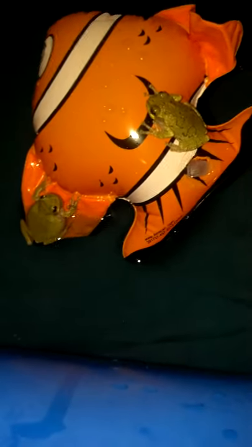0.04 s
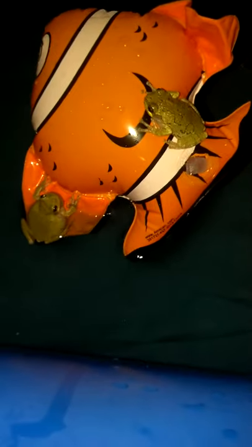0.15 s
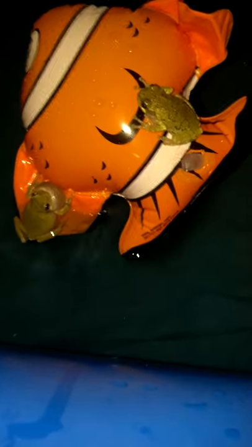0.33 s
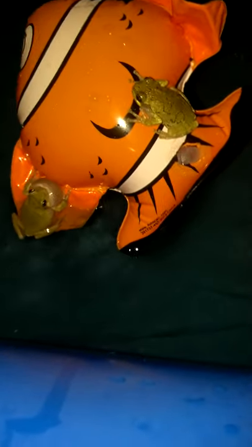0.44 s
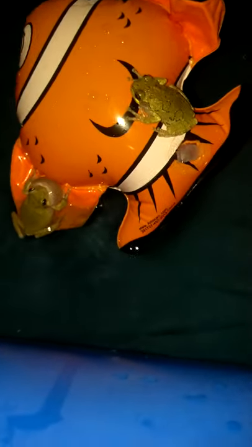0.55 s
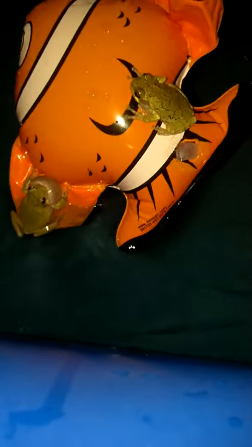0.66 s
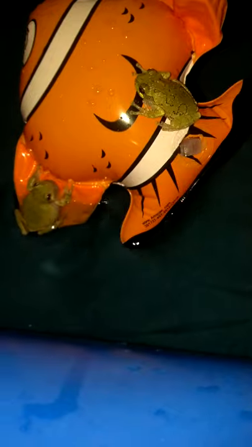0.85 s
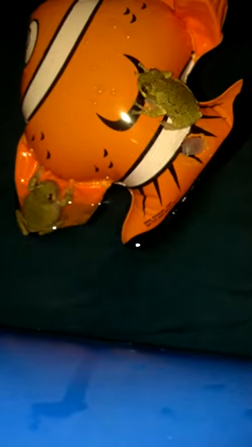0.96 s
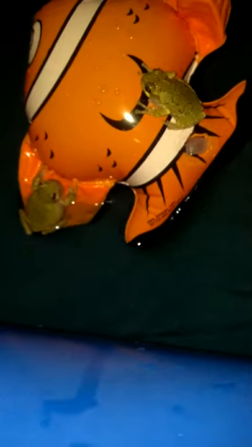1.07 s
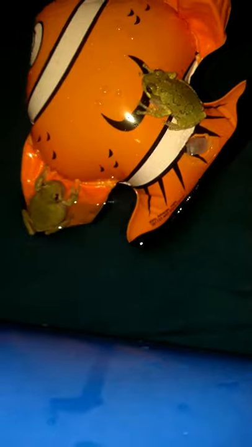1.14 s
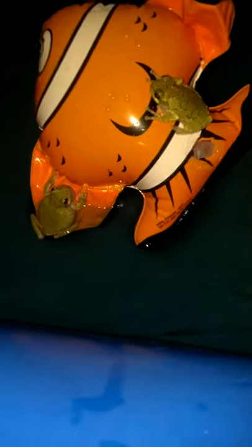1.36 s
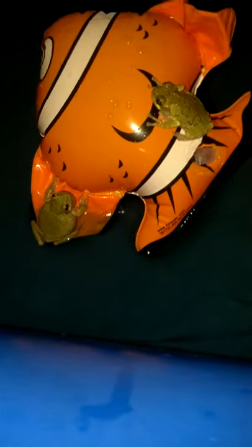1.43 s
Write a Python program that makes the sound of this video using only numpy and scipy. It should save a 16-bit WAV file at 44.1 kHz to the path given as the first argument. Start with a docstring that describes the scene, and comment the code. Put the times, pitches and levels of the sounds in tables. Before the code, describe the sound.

A tree frog's loud, harsh croak dominates, from about 0.21 to 0.74 seconds: rapid rising chirps, roughly 54 per second, fused into a buzzing rattle, its onset crackling with overload. Before it, a distant call's tail fades, then a soft bump at 0.15 and tiny throat clicks near 0.2. Slight poolside reflections follow; ducked faint night noise creeps back, and a far frog throbs faintly from 1.1.

```python
"""Night at a pool: faint steady outdoor noise throughout, with the tail of a distant frog call at the start.
A soft falling bump on the camera and three tiny throat clicks lead up to the main call.
A tree frog on a pool float then calls harshly for half a second, close by: a train of short rising chirps,
about 54 a second, of gliding sine partials and shaped noise, the first with overload crackle, with reflections.
The call makes the gain control duck the background, which creeps back; the far frog, throbbing noise, answers."""
import sys
import numpy as np
from scipy import signal
from scipy.fft import rfft, irfft
from scipy.io import wavfile
from scipy.ndimage import uniform_filter1d, minimum_filter1d

SR = 44100
rng = np.random.default_rng(int(sys.argv[2]) if len(sys.argv) > 2 else 0)


def output_pcm(signal):
    """Save a mono or channel-first signal as 16-bit PCM at the path in sys.argv[1].

    Samples are clipped to [-1, 1] before scaling.
    """
    pcm = np.clip(np.atleast_2d(signal).T, -1, 1) * 32767
    wavfile.write(sys.argv[1], SR, np.round(pcm).astype(np.int16))


N = 66150  # 1.5 s


def amp(db):
    """Decibels to gain."""
    return 10 ** (np.asarray(db) / 20)


def unit(x):
    """Scales to rms 1."""
    return x / np.sqrt(np.mean(x ** 2) + 1e-20)


def read(points, hz):
    """Reads a table of (f/Hz, value) on a log-frequency axis."""
    f, value = np.transpose(points)
    return np.interp(np.log(hz + 1), np.log(f + 1), value)


def noise(points):
    """Noise of rms 1, its spectrum shaped by (f/Hz, level/dB)."""
    shape = amp(read(points, np.fft.rfftfreq(N, 1 / SR)))
    return unit(irfft(rfft(rng.standard_normal(N)) * shape, N))


def ramp(u):
    """Smooth step from 0 to 1."""
    return np.sin(np.pi / 2 * np.clip(u, 0, 1)) ** 2


# outdoor noise colour shared by both microphone ports: [f/Hz, relative level/dB]
AIR_SHARED = [(18, -87.5), (30, -57.5), (118, -6.5), (261, -7), (291, -8), (480, -2.5), (881, -14),
              (1180, -7), (2340, -22), (2740, -44), (3130, -25), (4650, -22.5), (8310, -37), (14800, -36),
              (16500, -49.5)]
# outdoor noise colour in opposite phase at the ports: [f/Hz, relative level/dB]
AIR_OPPOSED = [(18, -41), (30, -9.5), (359, -3.5), (467, -8.5), (1180, -24), (1420, -28), (2340, -19.5),
               (8530, -35), (9730, -40.5), (14100, -28.5), (16500, -57)]
AIR_SHARED_DB, AIR_OPPOSED_DB = -54, -54.5  # rms


def night_air():
    """Faint steady outdoor noise: a shared part, plus a part opposed between ports that widens the bass."""
    mid = amp(AIR_SHARED_DB) * noise(AIR_SHARED)
    side = amp(AIR_OPPOSED_DB) * noise(AIR_OPPOSED)
    return np.array([mid + side, mid - side])


# calls of the distant frog: [t/s at full level, length/s, level/dB before the throb]
FAR_CALLS = [(0, 0.068, -56.5), (1.111, .36, -63.5)]
FAR_HZ, FAR_WIDTH_HZ, FAR_UPPER_DB = 1250, 110, -27  # main band, half-width, level of the upper band
FAR_THROB_HZ, FAR_THROB_DEPTH, FAR_FADE_S = 54, 1, .03


def far_frog():
    """A far call, blurred by the way into a throbbing noise band and a weak one almost an octave up."""
    t, hz = np.arange(N) / SR, np.fft.rfftfreq(N, 1 / SR)
    band = np.zeros(len(hz))
    for ratio, db in ((1, 0), (1.85, FAR_UPPER_DB)):
        band += amp(db) / (1 + ((hz - ratio * FAR_HZ) / FAR_WIDTH_HZ) ** 2)
    level = np.zeros(N)
    for start, length, db in FAR_CALLS:
        fade_in = ramp((t - start) / FAR_FADE_S + 1)
        fade_out = np.exp(-np.maximum(t - start - length, 0) / FAR_FADE_S)
        level += amp(db) * fade_in * fade_out
    throb = 1 + FAR_THROB_DEPTH * np.sin(2 * np.pi * FAR_THROB_HZ * t)
    blur = irfft(rfft(rng.standard_normal((2, N))) * band, N)
    return level * throb * unit(blur + .4 * blur[::-1])  # ports partly alike


# a soft bump on the camera, one row: [t/s, level/dB, start f/Hz, end f/Hz, length/s]
BUMP = (.1455, -33, 420, 90, .016)


def bump():
    """A short thud falling in pitch, pushing the two ports opposite ways, the right a little later."""
    start, db, from_hz, to_hz, length = BUMP
    u = np.clip((np.arange(N) / SR - start) / length, 0, 1)
    hz = from_hz * (to_hz / from_hz) ** u * (u > 0)
    thud = amp(db) * np.sin(np.pi * u) ** 2 * np.sin(2 * np.pi * np.cumsum(hz) / SR)
    return np.array([thud, -np.roll(thud, round(.0008 * SR))])


# throat clicks before the call: [t/s, level/dB of each of two rings, f/Hz of the lower ring]
CLICKS = [(.1920, -34.5, 1150), (.1982, -26.5, 950), (.2081, -37.5, 1000)]
CLICK_DECAY_S = 0.0031


def throat_clicks():
    """Tiny damped rings, a pitch and its octave, as the throat starts to move."""
    out = np.zeros(N)
    for start, db, hz in CLICKS:
        t = np.maximum(np.arange(N) / SR - start, 0)
        ring = np.sin(2 * np.pi * hz * t) + np.sin(4 * np.pi * hz * t)
        out += amp(db) * ramp(t / .0004) * np.exp(-t / CLICK_DECAY_S) * ring
    return out


ATTACK_S, HOLD_S, SWELL_DB = 0.0018, .0042, 6


def envelope(t, release):
    """A chirp opens, swells from -2 to -1 times SWELL_DB and is cut off on a bell-shaped release."""
    swell = amp(SWELL_DB * (np.clip(t / HOLD_S, 0, 1) - 2))
    return ramp(t / ATTACK_S) * swell * np.exp(-(np.maximum(t - HOLD_S, 0) / release) ** 2)


# course of the call: [t/s, chirps per s, effort level/dB]
CALL = [(0.2144, 56.8, -4), (0.253, 58.25, -3), (0.309, 56.04, -4.2), (0.372, 54.39, -1.92),
        (.46, 52.91, -3), (.53, 53.94, -4), (.59, 53.09, -3.5), (.665, 53.3, -2.5), (0.698, 50.41, 1.5),
        (0.738, 53.75, 1.5)]
CALL_DB, SHIMMER_DB = 14, 0.93  # gain of the whole call; random spread of chirp level
# partials of a chirp, from the fundamental up: [level/dB before the envelope, release/s]
PARTIALS = [(-12, 0.0044), (1, 0.002), (-21.5, 0.0016), (-27.5, 0.00048), (-37, .0016), (-46, .0016)]
PARTIAL_SPREAD_DB, LENGTH_SPREAD = .8, 0.019  # random, per chirp; length as a fraction
LOW_HZ, HIGH_HZ, GLIDE_MID_S, GLIDE_S = 1083.6, 1440, .0052, .0017  # pitch rises as the throat tightens
JITTER, ROUGH = .002, 0.017  # pitch fractions: spread between chirps, quick flutter inside one
# the fundamental rings on in the vocal sac, its pitch capped; the sac radiates no bass
SAC_HZ, LOW_CUT_HZ = 1344, 854
# a weak flutter leads each chirp but the first
LEAD_S, LEAD_LENGTH_S, LEAD_HZ, LEAD_DB = 0.0049, 0.0045, 1115, -28.5
# noise colour of the rasp in every chirp: [f/Hz, relative level/dB]
RASP = [(300, -34), (900, -6.5), (1650, 9.5), (2950, -3), (3600, 8.5), (4150, -12.5), (4700, -3),
        (5500, -11.5), (7000, -13.5), (9500, -18), (11500, -45.5), (14000, -31), (15300, -10), (16500, -41)]
RASP_DB, RASP_RELEASE_S, RASP_LINGER_DB = -28, 0.0023, -15
# noise colour of the overload crackle on the first chirps, as the recorder's input clips:
# [f/Hz, relative level/dB]
OVERLOAD_NOISE = [(500, -27.5), (1500, 2.5), (4500, -0.5), (6800, 6), (7400, -17.5), (8200, -45)]
# the overload eases off exponentially; OVERLOAD_DB is the extra level of the fundamental
EASE_S, OVERLOAD_DB, OVERLOAD_NOISE_DB = 0.033, 4.5, -20.5


def frog():
    """Rising chirps, strong in the second partial, with a little rasp; overload crackle on the first ones."""
    time, out = np.arange(N) / SR, np.zeros(N)
    rasp, crackle = noise(RASP), noise(OVERLOAD_NOISE)
    at, rate, effort = np.transpose(CALL)
    during = np.arange(at[0], at[-1], 1 / SR)
    count = np.cumsum(np.interp(during, at, rate)) / SR
    # a chirp starts each time the running count passes a whole number
    for start in np.interp(np.arange(int(count[-1]) + 1), count, during):
        near = abs(time - start) < .02
        t = time[near] - start
        wobble, shimmer, stretch, *colour = rng.standard_normal(len(PARTIALS) + 3)
        overload = np.exp(-(start - at[0]) / EASE_S)

        glide = LOW_HZ + (HIGH_HZ - LOW_HZ) / (1 + np.exp((GLIDE_MID_S - t) / GLIDE_S))
        flutter = unit(uniform_filter1d(rng.standard_normal(len(t)), size=40))
        hz = glide * (1 + JITTER * wobble + ROUGH * flutter)

        short = envelope(t, RASP_RELEASE_S)
        linger = amp(RASP_LINGER_DB) * envelope(t, 5 * RASP_RELEASE_S)
        chirp = amp(RASP_DB) * rasp[near] * (short + linger)
        chirp += amp(OVERLOAD_NOISE_DB) * overload ** 2 * short * crackle[near]

        for k, (db, release) in enumerate(PARTIALS, 1):
            partial_hz = np.minimum(hz, SAC_HZ) if k == 1 else k * hz
            turn = 2 * np.pi * np.cumsum(partial_hz) / SR
            # overload lifts the fundamental and lowers the second partial half as far
            db += OVERLOAD_DB * overload * ((k == 1) - .5 * (k == 2))
            db += PARTIAL_SPREAD_DB * colour[k - 1] * (k > 2)
            tone = np.sin(turn - np.interp(0, t, turn))  # zero phase at the chirp's start
            chirp += amp(db) * envelope(t * (1 + LENGTH_SPREAD * stretch), release) * tone

        lead = 2 * np.pi * LEAD_HZ * t
        lead_shape = np.sin(np.pi * np.clip((t + LEAD_S) / LEAD_LENGTH_S, 0, 1)) ** 2
        lead_tone = 0.22 * np.sin(lead) + np.sin(2 * lead)
        chirp += amp(LEAD_DB) * (start > at[0]) * lead_shape * lead_tone

        out[near] += amp(CALL_DB + np.interp(start, at, effort) + SHIMMER_DB * shimmer) * chirp
    low_cut = ramp(np.fft.rfftfreq(N, 1 / SR) / LOW_CUT_HZ) ** 8
    return irfft(rfft(out) * low_cut, N)


# right port against left: [f/Hz, lag/rad, loss level/dB]
PORTS = [(0, 0, 1), (770, 1.01, 7), (1295, 0.15, 2.5), (1800, 1.5, 1.5), (2293, 2.5, -0.5),
         (2785, 3.5, 2.5), (3600, 5, 1), (4700, 7, 1), (9443, 18.5, -1), (14000, 19.5, 0.5)]
# reflections from water and pool wall: [delay t/s, level/dB]
ECHOES = [(.0034, -24), (.0085, -32), (.0195, -32)]
# time for the yard tail to fall 60 dB: [f/Hz, t/s]
YARD_T60 = [(300, .5), (1300, 0.17), (2400, 0.49), (5000, .25), (15000, .15)]
# colour of both scatter and yard tail: [f/Hz, relative level/dB]
YARD_COLOUR = [(300, -4.5), (1100, 2.5), (1400, 10.5), (1900, -6), (2300, -12), (2700, -16), (3600, 2.5),
               (6000, -2)]
YARD_DB, NEAR_DB, NEAR_T60_S = -36, -28.5, 0.21  # yard tail; short scatter and its decay


def poolside(x):
    """Direct sound and reflections at the two ports, with a short scatter and a faint yard tail."""
    hz = np.fft.rfftfreq(N, 1 / SR)
    f, lag, loss = np.transpose(PORTS)
    echoes = sum(amp(db) * np.exp(-2j * np.pi * hz * s) for s, db in ECHOES)
    left = rfft(x) * (1 + echoes)
    right = left * amp(-np.interp(hz, f, loss)) * np.exp(-1j * np.interp(hz, f, lag))
    direct = irfft(np.array([left, right]), N)

    # one second of noise makes both tails; the scatter swaps its channels
    bins, t, z = signal.stft(rng.standard_normal((2, SR)), SR, nperseg=256)
    colour_db = read(YARD_COLOUR, bins)[:, None]
    decay_db = -60 * t / read(YARD_T60, bins)[:, None]
    yard = signal.istft(z * amp(colour_db + decay_db), SR, nperseg=256)[1][:, :SR]
    scatter = signal.istft(z * amp(colour_db), SR, nperseg=256)[1][::-1, :SR]
    scatter = scatter * amp(-60 * np.arange(SR) / SR / NEAR_T60_S)
    tail = amp(YARD_DB) * yard / np.linalg.norm(yard[0])
    tail += amp(NEAR_DB) * scatter / np.linalg.norm(scatter[0])
    return direct + signal.fftconvolve(x[None], tail, axes=1)[:, :N]


def scene():
    """Night air, far frog and bump, with the near frog and its clicks heard across the pool."""
    return night_air() + far_frog() + bump() + poolside(throat_clicks() + frog())


LIMIT_DB, RECOVER_DB_PER_S, CLAMP_S = -4.5, 5.5, 0.00045
EDGE_HZ = 16900  # top of the band


def record(dry):
    """Gain control clamps just ahead of each new peak and recovers slowly; then the band limit."""
    fall = np.arange(N) / SR * RECOVER_DB_PER_S
    width = max(int(CLAMP_S * SR), 2)
    over_db = np.maximum(20 * np.log10(abs(dry).max(0) + 1e-9) - LIMIT_DB, 0)
    gain_db = fall - np.maximum.accumulate(over_db + fall)
    # widen each clamp to start early, then round its edges
    gain_db = minimum_filter1d(gain_db, 2 * width)
    gain_db = uniform_filter1d(uniform_filter1d(gain_db, width), width)
    low_pass = signal.firwin(511, EDGE_HZ, window=("kaiser", 9), fs=SR)
    return signal.oaconvolve(dry * amp(gain_db), low_pass[None], "same")


dry = scene()
out = record(dry)
output_pcm(out)
```